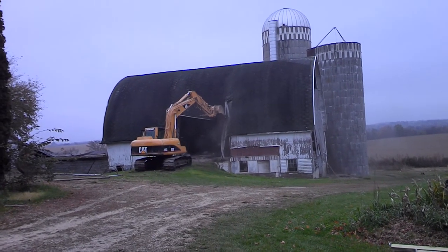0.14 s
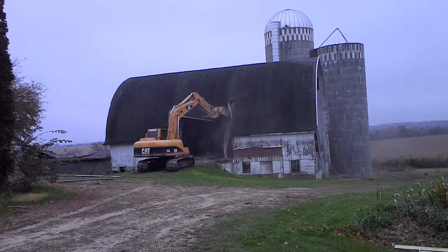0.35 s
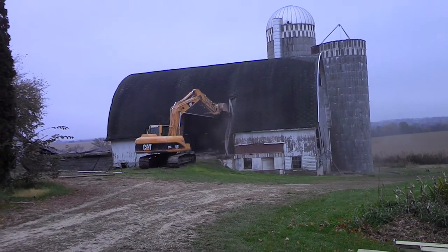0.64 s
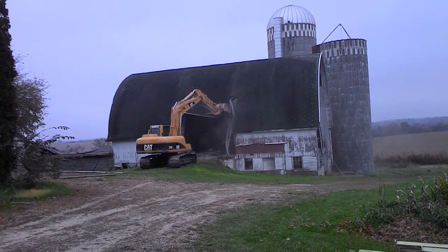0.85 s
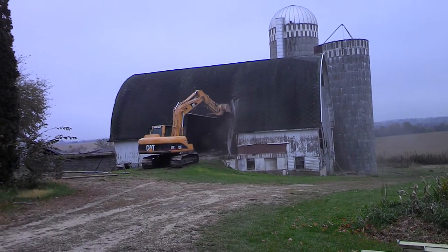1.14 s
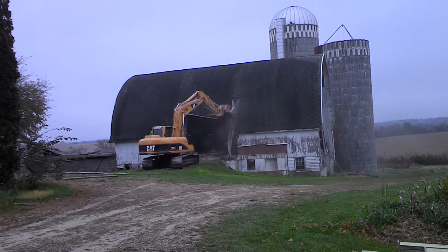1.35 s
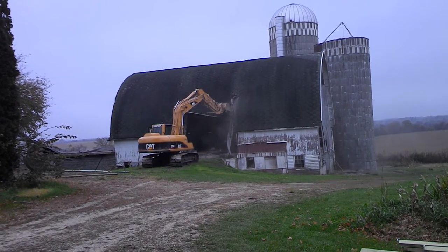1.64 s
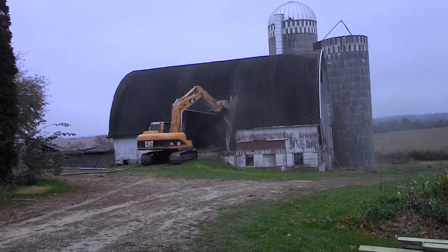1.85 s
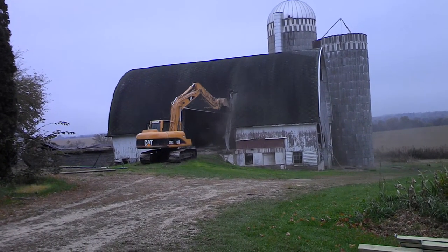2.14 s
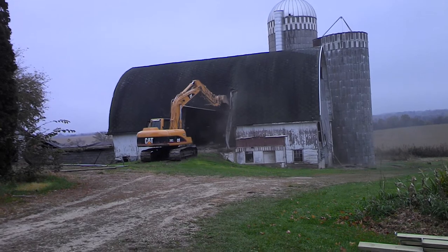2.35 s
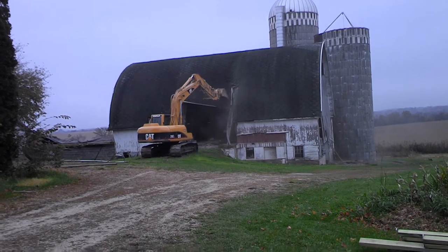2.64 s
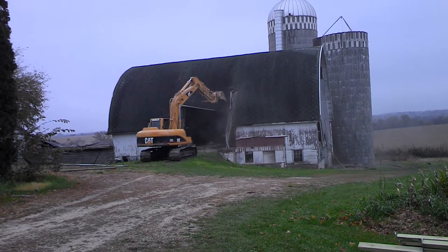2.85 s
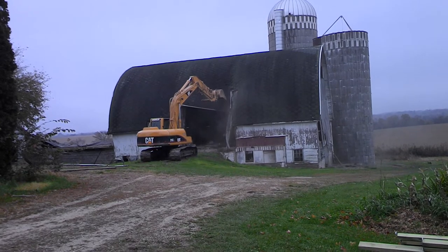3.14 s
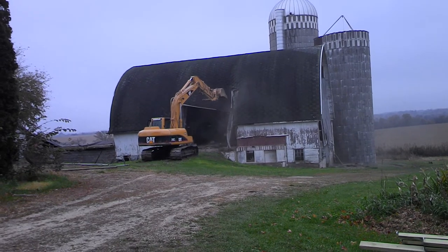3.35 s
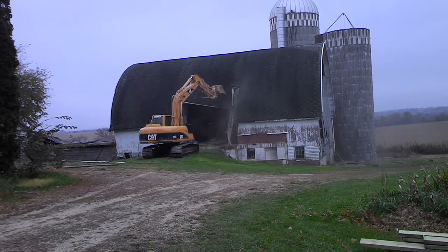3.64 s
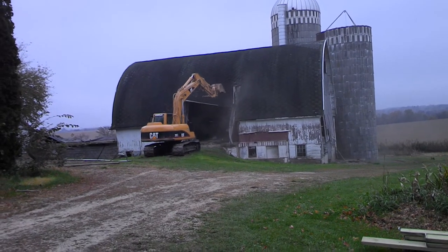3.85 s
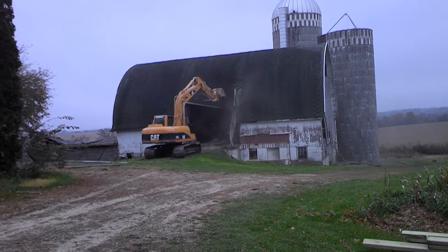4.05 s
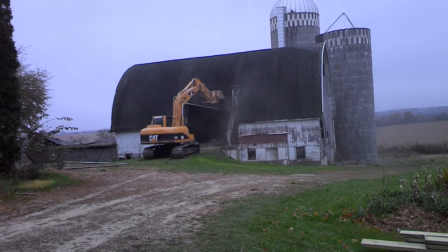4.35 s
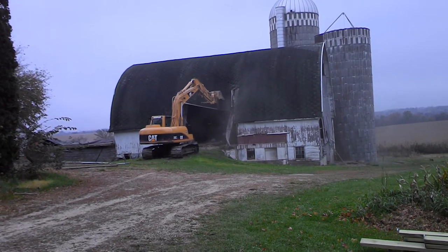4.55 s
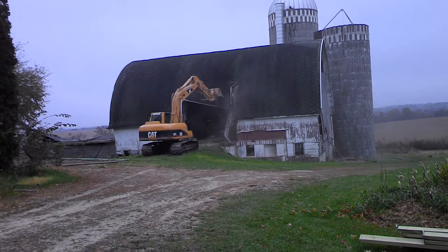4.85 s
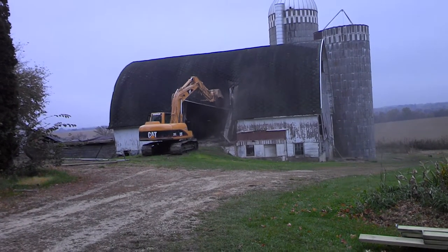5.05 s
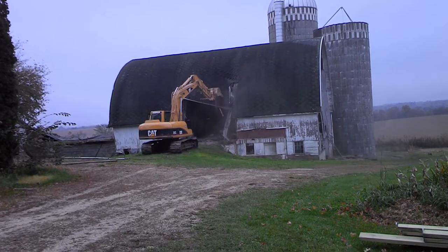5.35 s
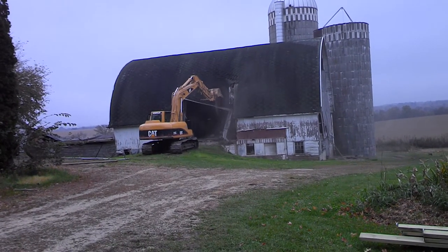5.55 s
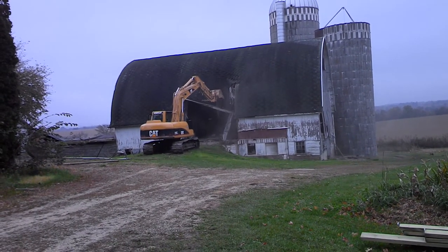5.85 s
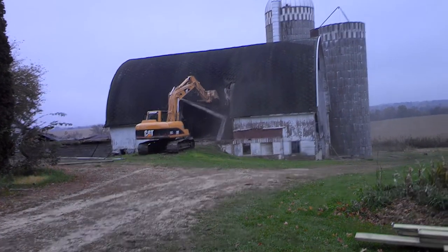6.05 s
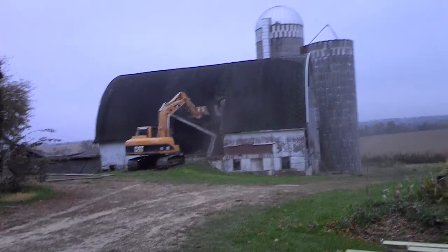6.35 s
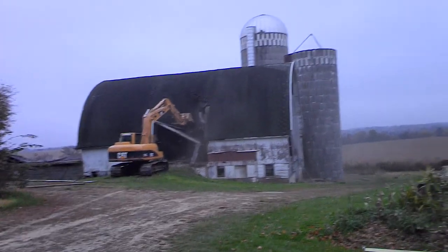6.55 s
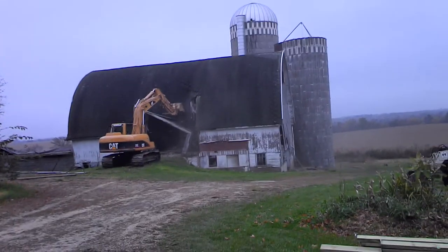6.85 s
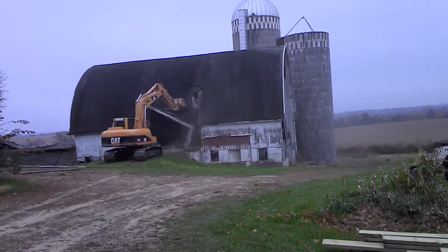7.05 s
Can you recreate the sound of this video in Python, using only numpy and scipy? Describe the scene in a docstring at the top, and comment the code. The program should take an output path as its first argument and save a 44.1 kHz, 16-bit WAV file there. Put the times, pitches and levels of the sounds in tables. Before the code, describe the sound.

A diesel excavator drones steadily for about seven seconds, some way off outdoors, with a light clatter and a hydraulic hiss that swells with each movement. In the first 1.3 seconds, wooden barn boards grind, knock and splinter, with sharp snaps near 0.6 and 1.2 seconds. From about 1.5 to 4 seconds the machine works almost alone, clattering harder while its pump whines faintly at shifting pitches. At 4 seconds the tearing resumes with knocks, a thump and a run of snaps. At 4.6 seconds a beam breaks with the loudest crack and a deep thud, and chips slide down. Around 5.6 seconds come another thump, more chips and a short creak. A low gust buffets the microphones near 6 seconds, with a heavy thump at 6.3. Smaller knocks and splits continue to the end. The barn wall adds a short echo.

```python
"""A diesel excavator drones, its hydraulics hissing and whining, while its bucket pulls at a wooden barn.
Boards grind, splinter and knock, timbers thump, one beam breaks with a loud crack, chips slide down,
a board creaks and a low gust passes. The barn reflects machine and wood to two close-set microphones."""
import sys
import numpy as np
from scipy import signal
from scipy.fft import rfft, irfft
from scipy.io import wavfile

SR = 44100
rng = np.random.default_rng(int(sys.argv[2]) if len(sys.argv) > 2 else 0)


def write(x):
    x = np.atleast_2d(x).T
    wavfile.write(sys.argv[1], SR, np.round(np.clip(x, -1, 1) * 32767).astype(np.int16))


N = 317961
T = np.arange(N) / SR

# plank on plank: t/s, level/dB, f/Hz
PLANK_HITS = [(0.214, -22.5, 794), (0.281, -24, 736), (0.46, -17.5, 825), (0.603, -22.5, 837),
              (0.951, -20.5, 787), (1.131, -26, 840), (4.052, -26.5, 924), (4.113, -25, 750),
              (4.137, -25, 840), (4.163, -23.5, 802), (4.519, -24, 840), (4.877, -26.5, 850),
              (4.964, -27, 840), (5.194, -29.5, 810), (6.315, -29, 866), (6.497, -28, 814),
              (6.982, -25, 992), (7.024, -29, 740), (7.065, -24, 950), (7.174, -26.5, 896)]


def amp(db):
    """Decibels to gain."""
    return 10 ** (np.asarray(db) / 20)


def unit(x):
    """Scale to rms 1."""
    return x / np.sqrt(np.mean(x ** 2) + 1e-20)


def burst(x):
    """Scale to the energy of 10 ms at rms 1."""
    return x / np.linalg.norm(x) * np.sqrt(SR / 100)


def at_hz(points, hz):
    """Interpolate over log frequency."""
    f, value = np.transpose(points)
    return np.interp(np.log(hz + 1), np.log(f + 1), value)


def curves(rows):
    """Interpolate each column over time."""
    s, *columns = np.transpose(rows)
    return [np.interp(T, s, c) for c in columns]


def add(mix, s, sound):
    """Mix a sound in at time s."""
    part = mix[max(round(s * SR), 0):][:len(sound)]
    part += sound[:len(part)]


def colour(x, spectrum, size=8192):
    """Minimum-phase filter; keeps the power of white noise."""
    log_gain = np.log(amp(at_hz(spectrum, abs(np.fft.fftfreq(size, 1 / SR)))))
    taps = np.fft.ifft(np.exp(np.conj(signal.hilbert(log_gain)))).real[:size // 2]
    return signal.oaconvolve(x, taps / np.linalg.norm(taps))[:N]


def band(x, hz, width_hz):
    """Two resonators in series, rms 1."""
    b, a = signal.iirpeak(hz, hz / width_hz, SR)
    return unit(signal.lfilter(b, a, signal.lfilter(b, a, x)))


def drift(hz):
    """Slow noise, rms 1."""
    lowpass = np.exp(-(np.fft.rfftfreq(N, 1 / SR) / hz) ** 2)
    return unit(irfft(rfft(rng.standard_normal(N)) * lowpass, N))


def grains(per_s, spread_db):
    """Random clicks of unequal size, rms 1."""
    size = amp(spread_db * np.minimum(rng.exponential(1, N), 4))
    return unit(size * rng.choice([-1, 1], N) * (rng.random(N) < per_s / SR))


def ticks(per_s, t60_s):
    """Random short puffs of noise, rms 1."""
    decay = amp(-60 * T[:SR // 20] / t60_s)
    power = signal.oaconvolve(grains(per_s, 2.7) ** 2, decay ** 2)[:N]
    return unit(np.sqrt(abs(power)) * rng.standard_normal(N))


def ram_effort(idle_clatter_db=-40.5, idle_oil_db=-47):
    """Each ram stroke is one arch of effort; returns clatter and oil hiss levels in dB."""
    # start/s, end/s, clatter rise/dB, hiss rise/dB
    strokes = [(-0.3, 1.45, 1, 3.5), (1.52, 3.18, 5.5, 7.5), (3.22, 3.87, 4, 4), (4.0, 7.5, 1.5, 3.5)]
    clatter_db, oil_db = idle_clatter_db, idle_oil_db
    for start, end, load_db, flow_db in strokes:
        arch = abs(np.sin(np.pi * np.clip((T - start) / (end - start), 0, 1)))
        clatter_db = clatter_db + load_db * arch ** 0.48  # load comes on at once
        oil_db = oil_db + flow_db * arch ** 1.4  # flow builds slowly
    return clatter_db, oil_db


def engine(clatter_db, fan_hz=150.2, fan_db=-37, rumble_db=-33.5, throb=0.087, waver=0.28):
    """Six-cylinder diesel: firing note, weaker orders from unequal cylinders, fan, rumble, clatter."""
    # t/s, firing rate/Hz, exhaust level/dB
    running = [(0.0, 88.06, -19.5), (0.06, 88.18, -20), (0.92, 88.0, -18.5), (1.61, 88.19, -20),
               (1.83, 86.7, -20), (2.95, 86.94, -18), (3.05, 88.44, -17.5), (3.23, 88.1, -20),
               (3.67, 88.0, -18), (4.12, 89.28, -22), (4.14, 89.67, -20.5), (4.72, 89.8, -21),
               (6.97, 89.65, -21), (7.21, 88.05, -21)]
    # level/dB per multiple of the engine cycle; the sixth is the firing note
    orders = [-52, -51, -28, -29.5, -21, 1.5, -20, -31.5, -28, -26.5, -26.5, -15, -29.5, -29.5, -21, -38,
              -38.5, -36.5]
    # f/Hz, level/dB
    rumble_spectrum = [(25, -16), (45, -5.5), (110, 0), (155, -1.5), (200, -4.5), (260, -7), (390, -7.5),
                       (490, -20.5), (700, -37), (2000, -78.5)]
    clatter_spectrum = [(300, -17), (520, -8), (720, -5.5), (900, -0.5), (1080, -0.5), (1200, -5),
                        (1380, 1), (1580, -10), (1750, -7), (2300, -11), (2800, -7.5), (3500, -14),
                        (6000, -21.5), (14000, -29.5)]
    hz, level_db = curves(running)
    cycle = 2 * np.pi * np.cumsum(hz * (1 + .003 * drift(8))) / SR / 6
    firing, uneven = np.cos(6 * cycle), np.cos(3 * cycle)
    note = 0
    for order, db in enumerate(orders, 1):
        # firing harmonics stay steadier and in phase: each puff has a sharp crest
        depth, offset = (throb, 0) if order % 6 == 0 else (waver, rng.uniform(0, 2 * np.pi))
        wander = 1 + depth * (drift(2.7) + 1j * drift(2.7))
        note = note + amp(db) * (wander * np.exp(1j * (order * cycle + offset))).real
    fan_phase = 2 * np.pi * np.cumsum(fan_hz * hz / hz.mean()) / SR
    fan = amp(fan_db) * (1 + .4 * drift(7.9)) * np.sin(fan_phase)
    puffs = unit(rng.standard_normal(N) * (1 + 0.32 * firing))
    rattle = unit(rng.standard_normal(N) * (1 + 0.11 * firing + 0.078 * uneven))
    rumble = amp(rumble_db) * colour(puffs, rumble_spectrum)
    clatter = amp(clatter_db) * colour(rattle, clatter_spectrum)
    return amp(level_db) * unit(note) + fan + rumble + clatter


def oil_hiss(level_db):
    """Oil hisses through the valves."""
    # f/Hz, level/dB
    spectrum = [(1000, -17), (3500, -6), (6000, 3.5), (8000, 0), (11000, -6), (15500, -8.5)]
    return amp(level_db + 0.32 * drift(25)) * colour(rng.standard_normal(N), spectrum)


def wall_giving(attack_s=0.037, grind_fall_db_per_s=40.5, splinter_fall_db_per_s=34):
    """The wall gives quickly, keeps tearing, then settles; returns grinding and splintering gains."""
    # start/s, hold/s, grinding/dB, splintering/dB
    gives = [(-0.03, .04, -36, -45), (0.187, .06, -36, -41.5), (0.59, .08, -35.5, -34.5),
             (0.935, 0.035, -34.5, -37), (1.12, .12, -36.5, -44.5), (4.05, 0.19, -31, -36.5),
             (4.479, 0.44, -30, -38), (5.106, 0.14, -34, -39), (5.505, 0.18, -28, -37),
             (5.778, 0.35, -30, -37.5), (6.989, 0.091, -30, -36)]
    grind, splinter = np.zeros(N), np.zeros(N)
    for start, hold, grind_db, splinter_db in gives:
        rise = np.clip((T - start) / attack_s, 0, 1)
        after_s = np.maximum(T - start - attack_s - hold, 0)
        grind = np.maximum(grind, rise * amp(grind_db - grind_fall_db_per_s * after_s))
        splinter = np.maximum(splinter, rise * amp(splinter_db - splinter_fall_db_per_s * after_s))
    return grind, splinter


def tearing(grind_gain, splinter_gain):
    """Boards grind over each other; fibres fizz and part with ticks; dry chips fly off."""
    # f/Hz, level/dB
    grind_spectrum = [(100, -7.5), (220, 1.5), (380, 3), (520, -8), (800, 3), (1000, -0.5), (1300, -5),
                      (2000, -8.5), (3500, -10.5), (8000, -28.5)]
    splinter_spectrum = [(500, -11), (1500, -4), (3500, 4), (6000, 8.5), (8500, -1.5), (12000, -12.5),
                         (15500, -15)]
    friction = unit(grains(2500, 3.03) * amp(2.8 * drift(35)))
    fibres = unit(ticks(per_s=110, t60_s=0.022) + 0.78 * grains(5000, 2.8))
    chips = amp(-8) * band(ticks(per_s=45, t60_s=0.0055), hz=10800, width_hz=11000)
    grind = colour(friction, grind_spectrum)
    splinter = colour(fibres, splinter_spectrum)
    return grind_gain * grind + splinter_gain * (splinter + chips)


def pump_whine(fade_s=0.069, waver=0.00497, flutter=0.25):
    """The hydraulic pump sings as the rams move."""
    # start/s, end/s, f/Hz, level/dB
    whines = [(0.1, 1.2, 1093, -41), (1.6, 2.75, 781, -46), (2.82, 3.17, 783, -37.5), (3.3, 3.64, 779, -40),
              (2.3, 3.75, 1316, -46), (1.5, 2.4, 1723, -48.5)]
    out = np.zeros(N)
    for start, end, hz, db in whines:
        swell = np.clip(np.minimum(T - start, end - T) / fade_s, 0, 1)
        phase = 2 * np.pi * np.cumsum(hz * (1 + waver * drift(24.5))) / SR
        out += amp(db) * swell * (1 + flutter * drift(27)) * np.sin(phase)
    return out


def strays(gain, count, spread_db=2):
    """Random small events, about as strong as the tearing around them: t/s, level/dB."""
    when, size = rng.random((count, 2)).T
    s = (np.arange(count) + when) / count * T[-1]
    local_db = 20 * np.log10(np.interp(s, T, gain) + 1e-9)
    return list(zip(s, local_db + spread_db * (2 * size - 1)))


def knocks(grind_gain, chatter_s=0.0034, stray_hz=850):
    """A plank chatters briefly against another and rings in its modes."""
    # frequency ratio, level/dB, t60/s
    modes = [(.76, -5, 0.056), (.9, -2, 0.062), (1, 12.5, 0.039), (1.17, 1, .05), (1.62, -15, 0.058),
             (2.5, -27, 0.07)]
    out, t = np.zeros(N), T[:SR // 3]
    stray = [(s, db - 0.5, stray_hz * np.exp(.1 * rng.standard_normal()))
             for s, db in strays(grind_gain, count=36)]
    for s, db, hz in PLANK_HITS + stray:
        ring = 0
        for ratio, mode_db, t60_s in modes:
            mode_hz = hz * ratio * rng.uniform(1.0, 1.03)
            ring = ring + amp(mode_db - 60 * t / t60_s) * np.sin(2 * np.pi * mode_hz * t)
        blow = rng.standard_normal(len(t)) * np.exp(-t / chatter_s)
        add(out, s, amp(db) * burst(signal.fftconvolve(ring, blow)[:len(t)]))
    # the knocks keep to the band between 550 Hz and 2.2 kHz, with little bass or treble
    return signal.sosfilt(signal.butter(2, (550, 2200), "band", fs=SR, output="sos"), out)


def board_splits(splinter_gain):
    """Big splits, slight ones under the knocks, and strays."""
    # t/s, sharp edge/dB, woody body/dB
    big = [(0.2161, -30.5, -42), (0.6011, -20, -32), (0.6428, -32, -45), (0.7148, -38, -42),
           (0.8121, -32, -46.5), (1.1677, -21, -44), (1.1799, -29, -52), (1.2056, -17, -38.5),
           (1.6134, -60, -44.5), (4.2742, -22, -39.5), (4.3819, -22, -45), (4.3914, -21, -38),
           (4.4548, -25.5, -33), (4.5211, -24, -38.5), (4.6844, -20, -34.5), (5.0565, -31.5, -54),
           (5.1592, -31, -37.5), (5.8635, -30, -33.5), (5.875, -36, -36), (5.92, -26, -40.5),
           (6.1742, -23.5, -43), (6.4956, -33.5, -45), (6.769, -46, -46), (6.8465, -35.5, -51),
           (7.0216, -40, -35)]
    struck = [(s, db - 18, db - 22) for s, db, _ in PLANK_HITS]
    stray = [(s, db + 0.5, db - 12) for s, db in strays(splinter_gain, count=30)]
    return big + struck + stray


def snaps(splits, edge_t60_s=0.025, body_t60_s=0.077, board_hz=2200, resplit_s=.012, resplit_db=-15):
    """A split opens with a sharp fracture and a weaker second; a run of small ones shakes the board."""
    # f/Hz, level/dB
    edge_spectrum = [(600, -7), (2500, 4), (5500, 5), (8000, 4), (12000, -4.5), (15500, -4)]
    body_spectrum = [(250, -7.5), (700, 0.5), (3300, -9), (5000, 3), (15000, -23.5)]
    edge, body, t = np.zeros(N), np.zeros(N), T[:SR // 8]
    for s, edge_db, body_db in splits:
        for delay_s, step_db in ((0, 0), (resplit_s, resplit_db)):
            noise = rng.standard_normal(len(t))
            jagged_decay = amp(4.1 * rng.standard_normal(len(t)) - 60 * t / edge_t60_s)
            add(edge, s + delay_s, amp(edge_db + step_db) * burst(noise * jagged_decay))
        shake = unit(rng.standard_normal(len(t)) * amp(-60 * t / body_t60_s))
        hz = board_hz * np.exp(0.11 * rng.standard_normal())
        ring = amp(-2) * band(shake, hz, width_hz=2000)
        add(body, s, amp(body_db) * (shake + ring))
    return colour(edge, edge_spectrum) + colour(body, body_spectrum)


def thumps(attack_s=0.0026):
    """Heavy timbers strike the frame, one low mode each."""
    # t/s, level/dB, f/Hz, t60/s
    blows = [(4.12, -20, 212, 0.27), (4.61, -17, 154.6, .3), (4.612, -27, 32, .25),
             (5.591, -18, 227.6, 0.2), (6.26, -22, 314, 0.31), (6.279, -19.5, 148, 0.49)]
    out, t = np.zeros(N), T[:SR // 3]
    rise = 1 - np.exp(-t / attack_s)
    for s, db, hz, t60_s in blows:
        add(out, s, amp(db - 60 * t / t60_s) * rise * np.sin(2 * np.pi * hz * t))
    return out


def beam_break(start_s=4.606, attack_s=0.0025, hold_s=.022, rush_t60_s=0.066, tail_t60_s=0.67):
    """A rush of tearing fibres, then a weaker tail as the last ones part."""
    # f/Hz, level/dB
    spectrum = [(100, -1.5), (500, -7.5), (950, -2.5), (1500, 0.5), (2400, 3), (3300, 1), (5500, 5),
                (7500, 0), (11000, -7.5), (15500, -13.5)]
    rise = np.clip((T - start_s) / attack_s, 0, 1)
    after_s = np.maximum(T - start_s - hold_s, 0)
    fall = amp(-60 * after_s / rush_t60_s) + amp(-12.5 - 60 * after_s / tail_t60_s)
    return amp(-5.5) * rise * fall * colour(grains(12000, 2.3), spectrum)


def chips_and_creak():
    """Chips slide down in short showers, and a board creaks near 1 kHz."""
    # middle/s, spread/s, level/dB, f/Hz, width/Hz; the narrow last row is the creak
    swells = [(4.75, 0.059, -28.5, 4600, 4100), (5.63, 0.07, -35, 3470, 1800),
              (5.62, 0.067, -32.5, 1550, 1200), (5.62, 0.053, -34.5, 990, 150)]
    out = np.zeros(N)
    for s, spread_s, db, hz, width_hz in swells:
        swell = np.exp(-.5 * ((T - s) / spread_s) ** 2)
        out += amp(db) * swell * band(grains(6000, 3.3), hz, width_hz)
    return out


def wind():
    """A low gust buffets the microphones."""
    # t/s, level/dB
    gust = [(5.55, -52), (6.0, -28), (6.15, -31), (6.26, -25), (6.6, -49)]
    # f/Hz, level/dB
    spectrum = [(10, -36), (38, -4), (60, -7), (120, -20), (600, -65)]
    return amp(curves(gust)[0]) * colour(rng.standard_normal(N), spectrum)


def barn_echo(x, echoes_per_s=2500, low_cut_hz=350):
    """Scattered reflections from walls and silos, different at each microphone."""
    # f/Hz, t60/s
    decay = [(150, 0.58), (900, 0.61), (3000, 0.54), (6000, 0.34), (14000, 0.16)]
    taps = rng.choice([-1., 1.], (2, SR)) * (rng.random((2, SR)) < echoes_per_s / SR)
    hz, t, frames = signal.stft(taps, SR, nperseg=256)
    fade = amp(-60 * t / at_hz(decay, hz)[:, None])
    tail = signal.istft(frames * fade, SR, nperseg=256)[1]
    tail = signal.sosfilt(signal.butter(2, low_cut_hz, "high", fs=SR, output="sos"), tail)
    return signal.fftconvolve(x[None], tail / np.linalg.norm(tail[0]), axes=1)[:, :N]


def mic_pair(direct, scattered=0, lag_s=4 / SR):
    """Sound reaches the right microphone just before the left; scattered sound sets the two apart."""
    return np.array([np.interp(T - lag_s, T, direct + scattered), direct - scattered])


def scene():
    """Machine and timber stand far off, in front of the barn wall."""
    clatter_db, oil_db = ram_effort()
    grind_gain, splinter_gain = wall_giving()
    splits = board_splits(splinter_gain)
    machine = engine(clatter_db) + pump_whine()
    timber = tearing(grind_gain, splinter_gain) + knocks(grind_gain) + thumps()
    cracks = snaps(splits) + beam_break()
    mix = barn_echo(amp(-6.5) * machine + amp(-8.5) * timber + amp(-13.5) * cracks)
    mix += mic_pair(machine + timber)
    # a second, independent draw of each source is its scattered part
    mix += mic_pair(cracks, amp(-8.5) * (snaps(splits) + beam_break()))
    mix += mic_pair(oil_hiss(oil_db), amp(-6) * oil_hiss(oil_db))
    mix += mic_pair(wind(), amp(-7) * wind())
    mix += mic_pair(chips_and_creak(), amp(2) * chips_and_creak())
    return mix


def record(dry, cutoff_hz=16000):
    """The microphones differ in colour; peaks clip at full scale; a low-pass follows."""
    # f/Hz, left minus right/dB
    tilt = [(60, 4), (250, 4.5), (500, 1), (1000, 1), (1800, -3.5), (3000, -2), (4500, -0.5), (6300, 0.5),
            (8500, -3.5), (11000, -9.5), (15000, -8)]
    tilt_db = at_hz(tilt, np.fft.rfftfreq(N, 1 / SR))
    heard = irfft(rfft(dry) * amp(np.array([tilt_db, -tilt_db]) / 2), N)
    lowpass = signal.firwin(511, cutoff_hz, window=("kaiser", 9), fs=SR)
    return signal.oaconvolve(np.clip(heard, -1, 1), lowpass[None], "same")


dry = scene()
out = record(dry)
write(out)
```